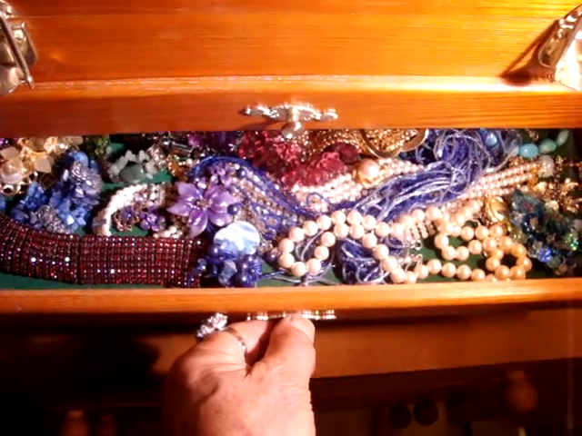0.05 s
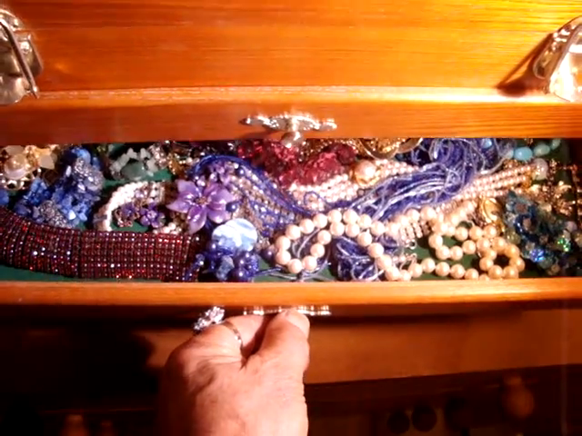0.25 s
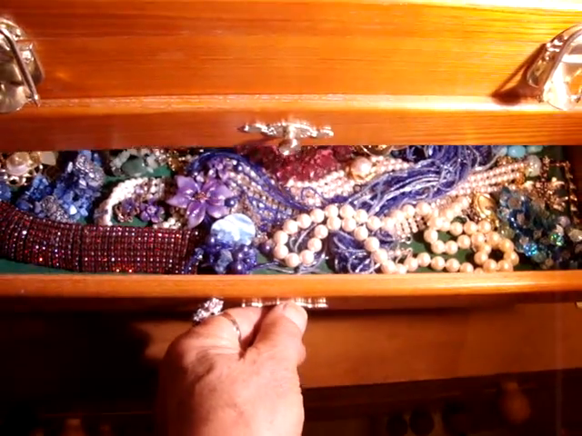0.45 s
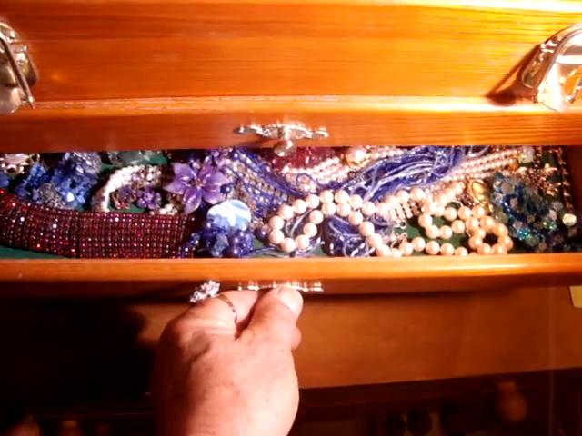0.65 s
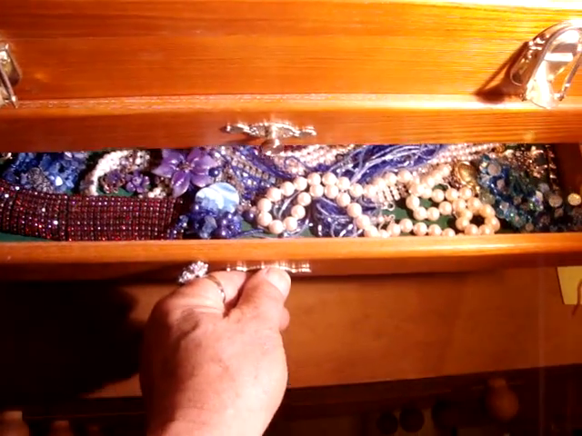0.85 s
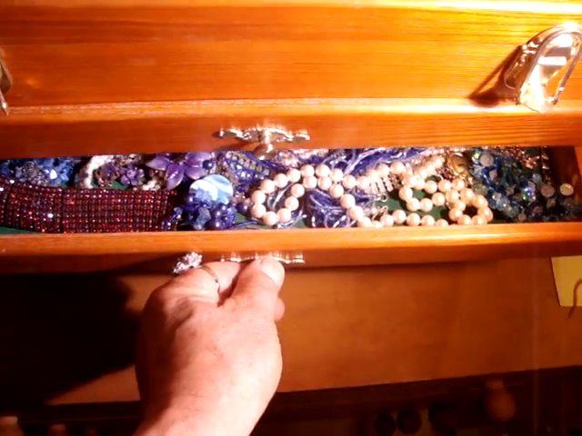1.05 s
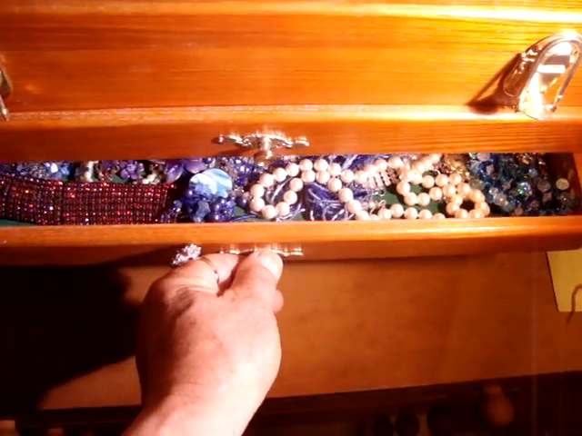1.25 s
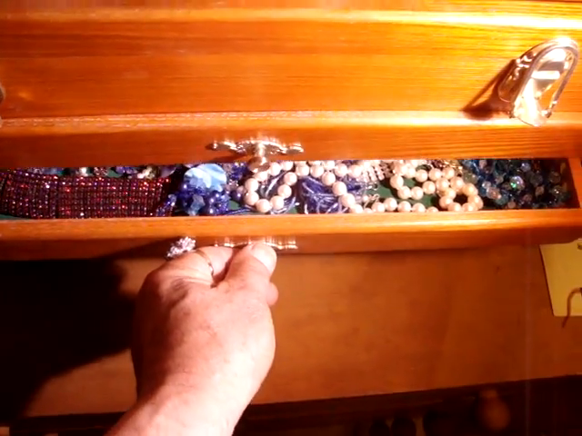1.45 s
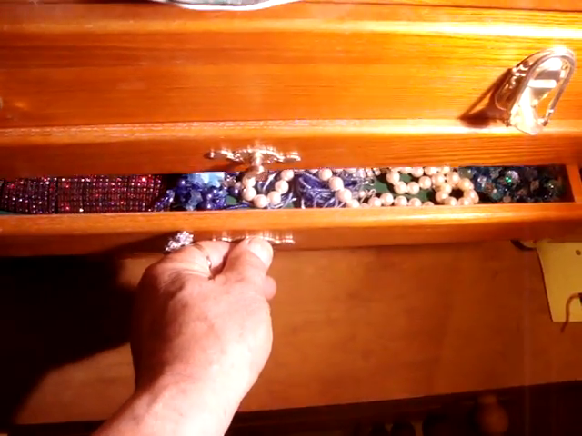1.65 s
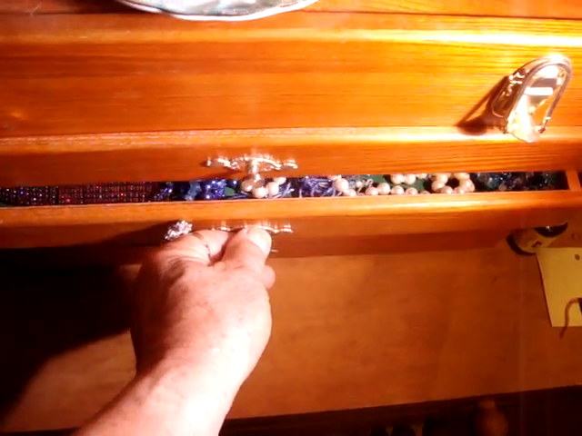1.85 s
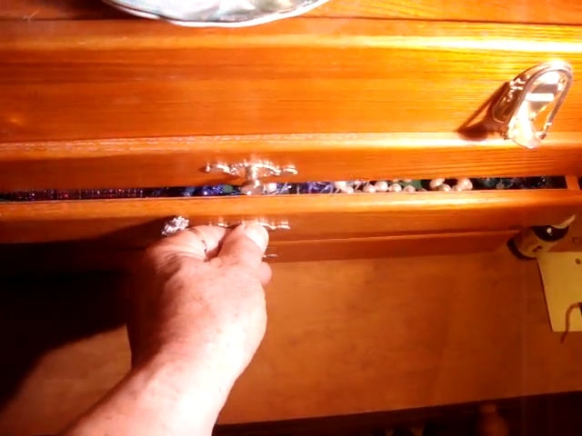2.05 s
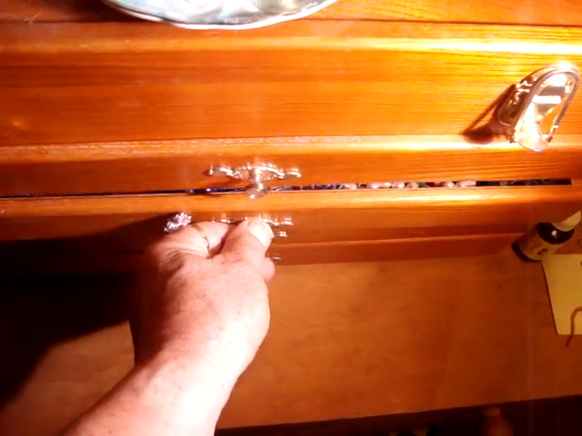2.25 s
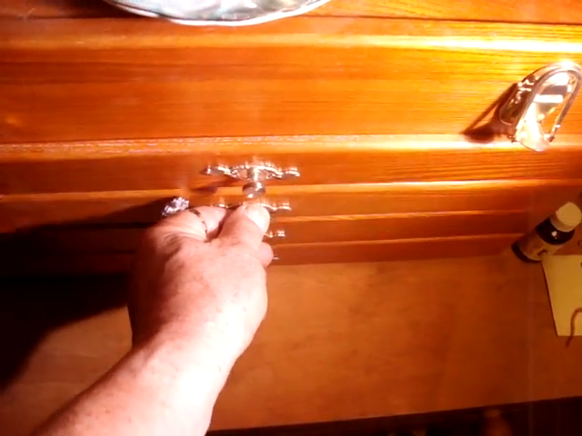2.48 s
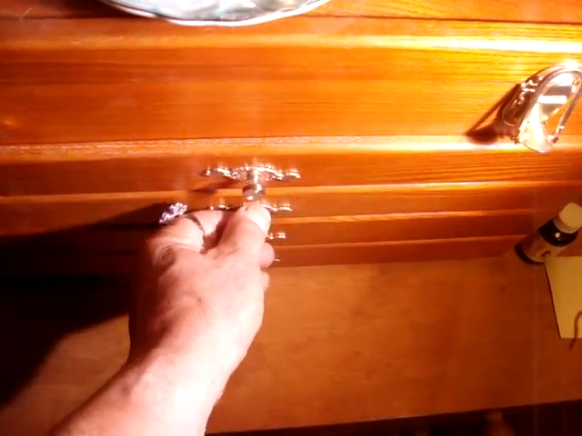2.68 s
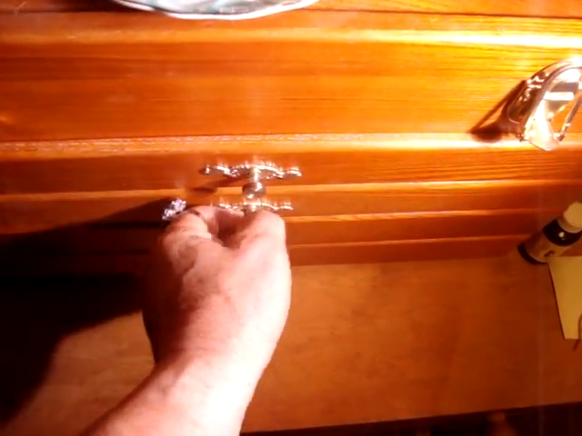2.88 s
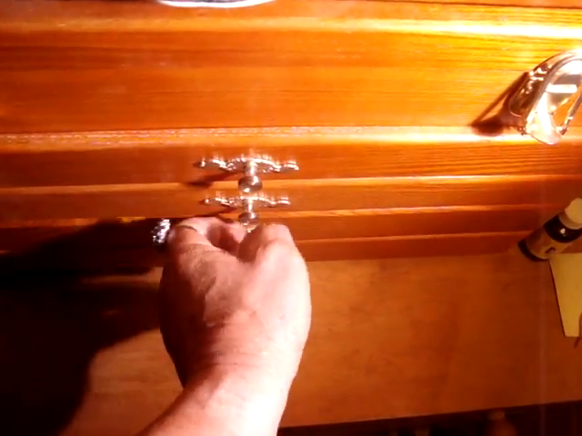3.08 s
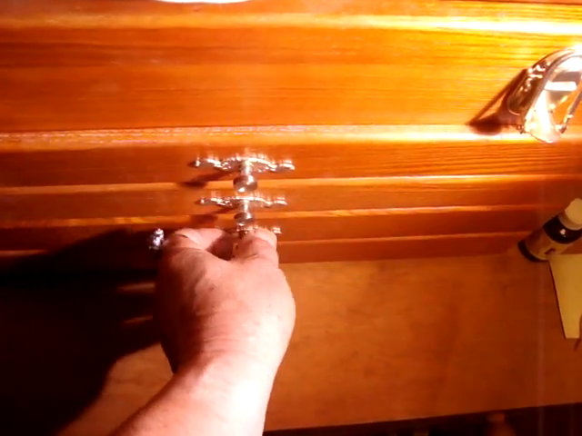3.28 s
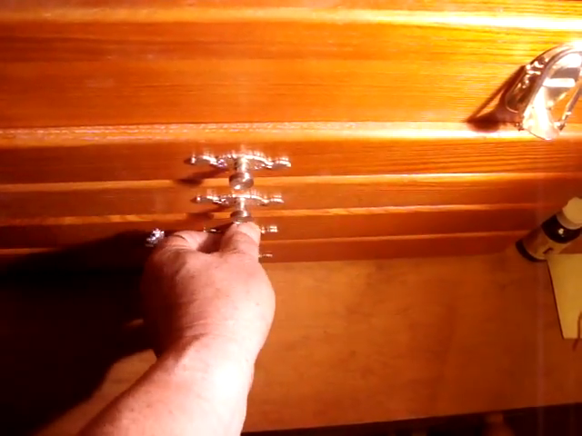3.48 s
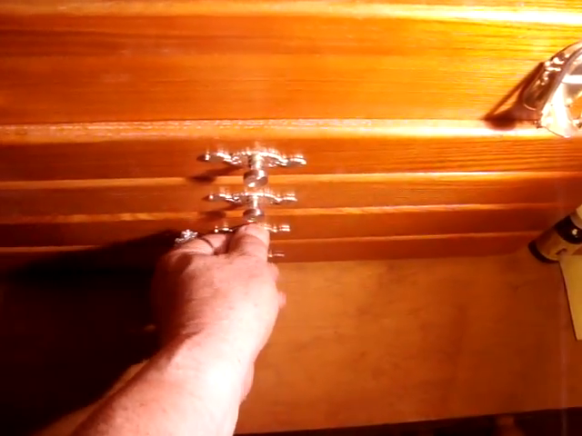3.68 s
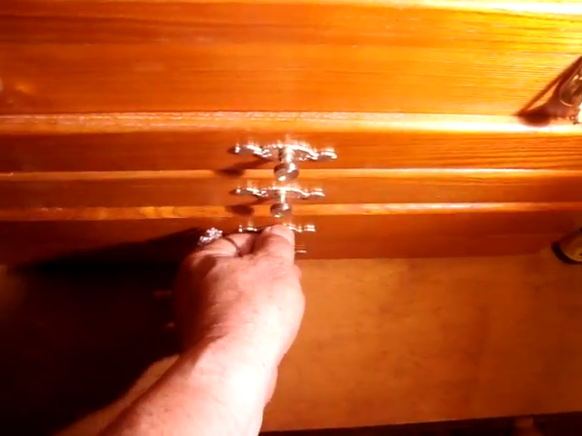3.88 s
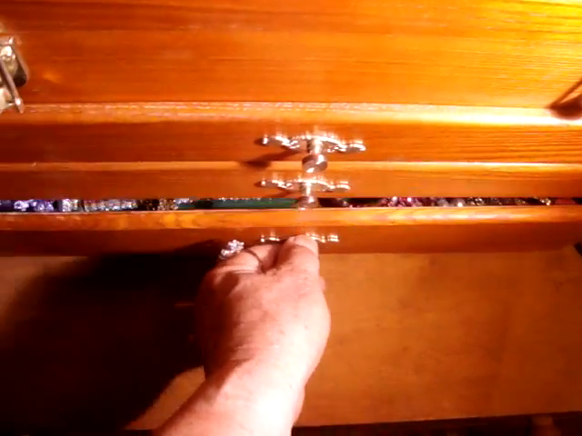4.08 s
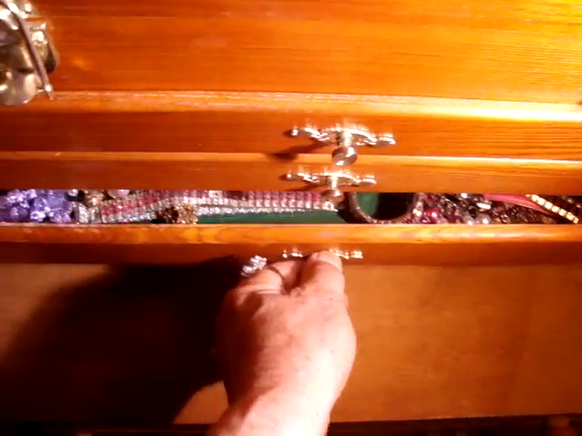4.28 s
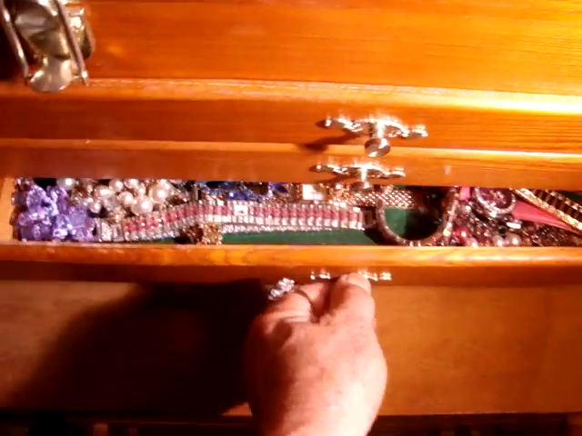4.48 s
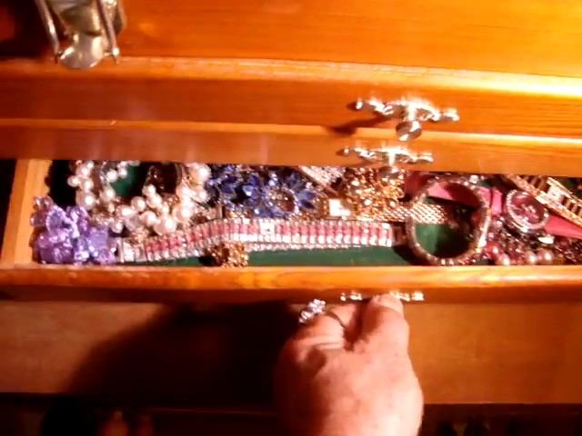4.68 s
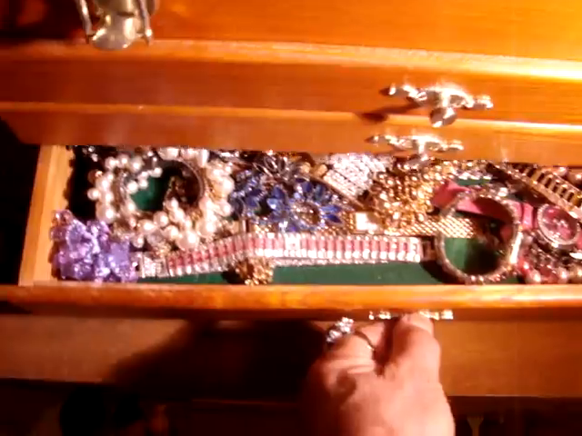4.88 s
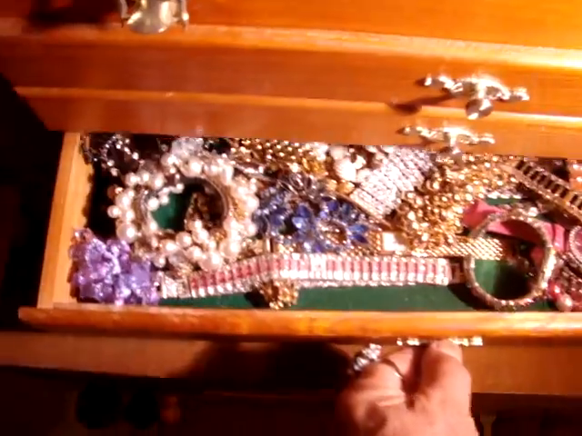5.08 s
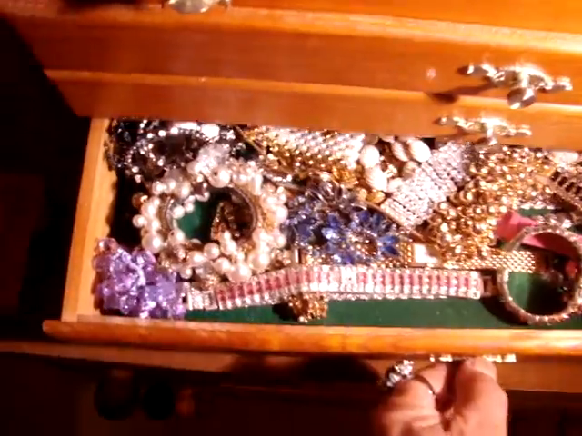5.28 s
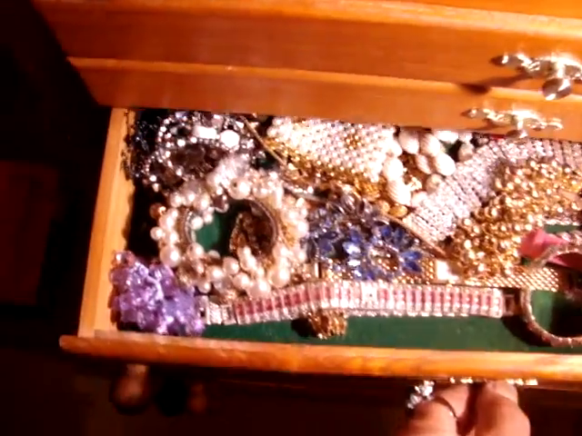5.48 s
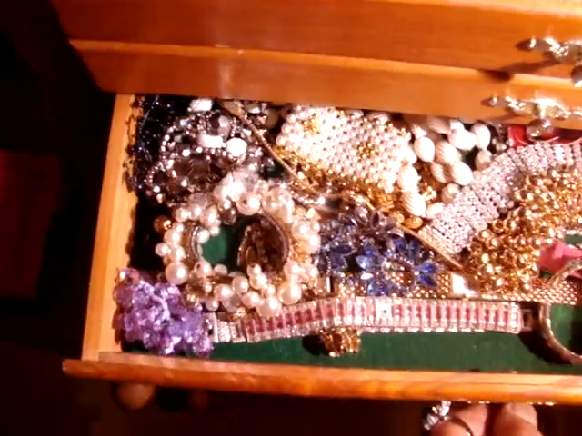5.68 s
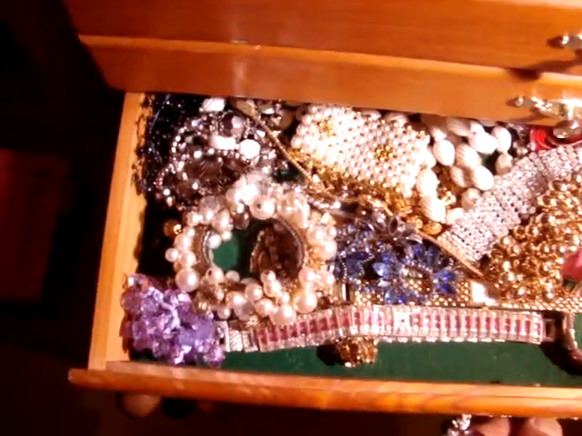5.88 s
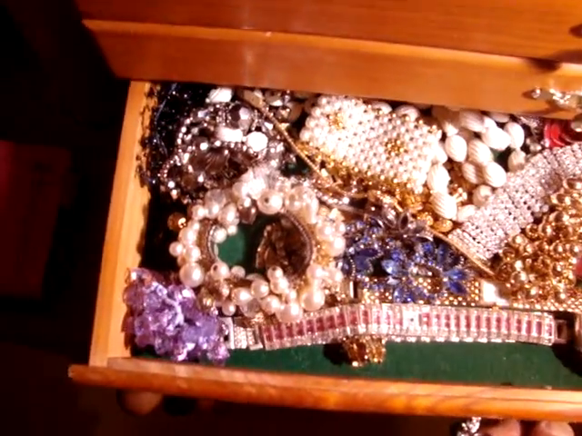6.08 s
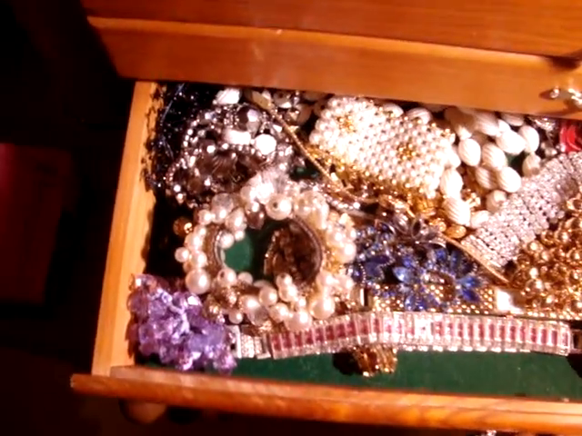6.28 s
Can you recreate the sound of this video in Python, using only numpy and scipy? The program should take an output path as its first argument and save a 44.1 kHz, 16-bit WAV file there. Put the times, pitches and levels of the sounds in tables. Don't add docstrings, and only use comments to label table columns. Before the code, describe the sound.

Close up in a quiet room, a shallow wooden drawer is pushed shut with a grainy, resonant rub and a few faint ticks, ending in a loud hollow wooden knock with a quick rattle. After a near-silent pause with tiny metal clicks, a second drawer is pulled open, rubbing unevenly and bumping softly at its stop. The small microphone hisses steadily over a faint distant rumble.

```python
import sys
import numpy as np
from scipy import signal
from scipy.fft import rfft, irfft, next_fast_len
from scipy.io import wavfile
from scipy.ndimage import uniform_filter1d

SR = 44100
rng = np.random.default_rng(int(sys.argv[2]) if len(sys.argv) > 2 else 0)


def voltage_ratio(decibels):
    exponent = np.asarray(decibels, float) / 20
    return 10 ** exponent


def master_out(mix):
    frames = np.transpose(np.atleast_2d(mix))
    ceiling = np.clip(frames, -1, 1)
    pcm = np.round(ceiling * 32767).astype(np.int16)
    wavfile.write(sys.argv[1], SR, pcm)


N = 279622

# pitch_hz, width_hz, level_db
UPPER_PANELS = [(600, 37, 5), (990, 39, -15), (1356, 24, 4.5), (1505, 150, -0.5), (1900, 130, -16),
                (2490, 100, -0.5), (2900, 340, -7), (3270, 125, -0.5), (4100, 250, -10), (4740, 760, -14.5)]
# pitch_hz, width_hz, level_db
LOWER_PANELS = [(600, 33, 0), (770, 120, 4.5), (1100, 250, 0), (1380, 110, 3.5), (1860, 200, -2.5),
                (2210, 180, -7.5), (2680, 280, -3), (2930, 130, 0.5), (3470, 220, -10), (4060, 52, -3),
                (5300, 640, -25)]
# time_s, level_db
SHARP_RINGS = [(0, -13), (.505, -13), (.517, 5), (.9, 5.5), (1.1, -0.5), (1.4, -15), (2.5, -26)]
# freq_hz, level_db
RUB_SPECTRUM = [(250, -47), (450, 6.5), (1000, 11), (3000, 4.5), (6000, -2.5), (10000, -9)]

# time_s, pressure_db, load_zone (0 bottom panel, 1 front
PUSH_SHUT = [(0, -61, 0.78), (.2, -49, .7), (.3, -60, 1.0), (.42, -51, 1.1), (.505, -51, 0.92),
             (.518, -46.5, 1.0), (.64, -47.5, 1.02), (.82, -47, 1.18), (1.1, -52, 1.1),
             (1.19, -55, 1.0), (1.27, -49.5, 1.64), (1.36, -53.5, 1.0), (1.5, -56, 1.5), (1.63, -52, 1.35),
             (1.8, -49.5, 1.2), (1.87, -59, 1.6), (2.2, -60, 1.0), (2.48, -53.5, 1.3)]
PULL_OPEN = [(3.85, -70, .8), (3.95, -61, 1.2), (4.13, -53, 1.3), (4.22, -54, 1.2), (4.32, -57, 1.4),
             (4.43, -52.5, 1.27), (4.6, -50.5, 1.3), (4.645, -46.5, 1.1), (4.69, -47, 1.05),
             (4.77, -51, 1.1), (4.95, -48.5, .9), (5.03, -48, 0.59), (5.09, -53, 1.36), (5.2, -55.5, 1.27),
         (5.47, -59.5, 1.3), (5.6, -49, 0.8), (5.69, -54.5, 1), (5.75, -63, .1)]

# pitch_hz, level_db, t60_s
CABINET_MODES = [(284, -0.5, 0.054), (391, -11.5, 0.038), (481, -1, 0.017), (650, 6, 0.025),
                 (853, 2.5, 0.026), (950, 1, 0.029), (1094, -0.5, 0.025), (1208, 6.5, 0.027),
                 (1380, 2, 0.023), (1580, -15.5, 0.033), (1650, -4.5, 0.025), (1945, 1.5, 0.021),
                 (2110, 2, 0.023), (2370, -3, 0.025), (3050, -9, 0.056), (3100, -1, 0.022),
                 (3770, -15, 0.013), (4600, -14, .012), (5700, -31, .012)]
# start_s, level_db, centre_hz, spread_oct, ring_time_factor
RAPS = [
    (.1628, -24, 1080, 0.93, 0.73),
    (2.5464, -16.5, 484, 0.24, 1.9),
    (2.5469, -4, 1240, 0.7, 0.27),
    (2.5487, -7.5, 1280, 0.64, 0.32),
    (4.665, -33, 1800, .8, 0.64),
]
# start_s, level_db, centre_hz, spread_oct, ring_time_factor
THUDS = [(0.1616, -36, 1150, 1.4, 0.88), (1.795, -42, 400, 0.56, 0.77), (2.4935, -27, 452, 0.36, 0.77),
         (2.497, -26.5, 760, 1.24, 0.68), (2.503, -41, 504, 0.37, 0.84), (2.543, -39.5, 1500, 0.89, 0.69),
         (2.5514, -1.5, 1380, 0.4, 0.13), (2.554, -23, 1770, 0.6, 0.8), (2.558, -22, 1520, 0.15, 0.73),
         (2.563, -22.5, 830, 0.35, 1.1), (2.572, -49, 1490, 0.97, 0.53), (2.579, -32, 1290, 0.63, 1.1),
         (4.074, -40, 420, 0.92, 2.1), (4.088, -38.5, 750, 1.2, 1), (4.66, -30, 1200, 1, 0.35),
         (4.74, -34.5, 1620, 0.35, 0.96), (4.78, -36.5, 1300, .6, 1.4)]
# start_s, level_db, centre_hz, width_hz, t60_s
TICKS = [(.162, -36, 3564, 1200, 0.027), (.418, -45, 4870, 1500, 0.026), (.418, -41.5, 8400, 2500, 0.02),
         (.419, -42, 3100, 1400, 0.038), (.78, -49.5, 4100, 540, 0.62), (1.61, -57, 3050, 550, 2.4),
         (2.288, -46.5, 6770, 500, 0.018), (3.272, -49, 1900, 300, 0.2), (3.274, -49.5, 916.7, 756, 0.13),
         (3, -59, 4300, 400, .05), (3.1, -54, 430, 150, .06), (3.796, -46.5, 2900, 1944, 0.041),
         (2.8, -48, 500, 400, 0.028), (4.2, -56, 1000, 600, 0.044), (4.44, -55, 2700, 700, 0.94),
         (4.655, -38.5, 2040, 300, .06), (4.699, -49, 1770, 500, 1), (4.98, -58, 3800, 1000, .7),
         (5.269, -45.5, 2500, 2500, 0.027), (5.562, -47, 650, 400, 0.78), (5.565, -55, 3200, 1600, 0.49)]
# start_s, level_db, pitch_hz, t60_s
BUMPS = [(1.797, -40, 280, 0.055), (2.494, -39, 245, .1), (2.55, -30, 171, 0.072), (2.559, -45, 114, 0.13),
         (3.733, -39.5, 210, 0.026), (4.074, -29.5, 269, 0.031), (5.563, -35, 188, 0.051),
         (5.636, -47.5, 196, 0.12), (5.621, -46.5, 351, 0.16), (5.709, -53, 200, 0.054)]

# freq_hz, t60_s
ROOM_DECAY = [(100, 0.34), (500, 0.18), (1500, 0.073), (4000, 0.019), (10000, 0.12)]
# freq_hz, density_db_per_hz
HISS_SPECTRUM = [(15, -54), (25, -8), (97, -17), (190, -7), (284, -4), (355, -4), (403, -2.5), (456, -3.5),
                 (492, -4.5), (648, -3), (1040, -6), (1150, -6), (2630, -10), (9920, -19.5), (12900, -85),
                 (21800, -120)]
# time_s, level_db
RUMBLE_LEVEL = [(0.0, -69), (0.3, -67), (4.3, -70), (4.7, -76.5), (6.34, -75)]
# click_s, low_hz, high_hz, depth_db
CLICK_GAPS = [(.164, 3200, 4600, -30), (.163, 5500, 8800, -22), (.42, 6600, 10500, -45),
              (2.289, 6200, 7800, -30), (2.546, 680, 10500, -50), (3.082, 6400, 7600, -35)]


def evened(x):
    return x / np.sqrt(np.mean(x ** 2) + 1e-20)


def read(points, hz):
    f, value = np.transpose(points)
    return np.interp(np.log(hz + 1), np.log(f + 1), value)


def add(mix, start_s, sound):
    part = mix[round(start_s * SR):][:len(sound)]
    part += sound[:len(part)]


def colour(x, gain):
    size = next_fast_len(len(x))
    return irfft(rfft(x, size) * gain(np.fft.rfftfreq(size, 1 / SR)), size)[:len(x)]


def wood_slips(size, judder_db, grit_db):
    judder = uniform_filter1d(uniform_filter1d(rng.standard_normal(N), 300), 300)
    judder = evened(judder)[:size]
    strength = voltage_ratio(grit_db * np.minimum(rng.exponential(1, N), 5))
    happens = rng.random(N) < 5000 / SR
    slips = strength * happens * rng.choice([-1, 1], N)
    return evened(slips[:size]) * voltage_ratio(judder_db * judder)


def slide(rows, panels, sharp_db, zones_db, judder_db, grit_db, rub_db):
    time_s, pressure_db, load = np.transpose(rows)
    t = np.arange(time_s[0], time_s[-1], 1 / SR)
    slips = wood_slips(len(t), judder_db, grit_db)
    zones = np.zeros((3, len(t)))
    for hz, width_hz, db in panels:
        ring = colour(slips, lambda f: voltage_ratio(db) / (1 + 2j * (f - hz) / width_hz))
        wax_db = 1.3 * np.interp(t, np.arange(200) * 0.044, rng.standard_normal(200))
        ring = ring * voltage_ratio(wax_db)
        if hz > 1300 and width_hz < 270 and not 1500 < hz < 2200:
            ring = ring * voltage_ratio(sharp_db(t))
        zones[np.searchsorted([1150, 2200], hz)] += ring
    for k, (low_hz, high_hz) in enumerate([(0, 1150), (1150, 2200), (2200, SR)]):
        zones[k] += colour(slips, lambda f: voltage_ratio(rub_db + read(RUB_SPECTRUM, f)) * (f >= low_hz) * (f < high_hz))

    pressure_db = np.interp(t, time_s, pressure_db)
    load = np.interp(t, time_s, load)
    rubbing = np.zeros(len(t))
    for k, zone in enumerate(zones):
        distance_db = 5.0 * abs(load - k)
        rubbing += voltage_ratio(pressure_db + zones_db[k] - distance_db) * evened(zone)
    out = np.zeros(N)
    add(out, time_s[0], rubbing)
    return out


def cabinet_blow(level_db, centre_hz, spread_oct, ring, crack_db, chance):
    t = np.arange(SR // 5) / SR
    hz, mode_db, t60_s = np.transpose(CABINET_MODES)[:, :, None]
    level_chance, tune_chance = chance

    reach_db = -6 * (np.log2(hz / centre_hz) / spread_oct) ** 2
    envelopes = voltage_ratio(mode_db + reach_db + 2 * level_chance - 60 * t / (t60_s * ring))
    tones = envelopes * np.sin(2 * np.pi * hz * (1 + 0.017 * tune_chance) * t)
    signs = (-1) ** np.arange(len(hz))[:, None]
    body = (tones * signs).sum(0)

    crack = evened(colour(rng.standard_normal(len(t)), lambda f: 1 / (1 + ((f - 3300) / 3600) ** 2)))
    crack = crack * voltage_ratio(crack_db - 60 * t / 0.011)

    def near_blow(f):
        octaves = np.log2((f + 1) / centre_hz)
        return voltage_ratio(-6 * (octaves / (spread_oct + 0.39)) ** 2) * (f > 120)

    clatter = evened(colour(rng.standard_normal(len(t)), near_blow))
    clatter = clatter * voltage_ratio(-13.5 - 60 * t / (0.048 * ring))
    attack = np.minimum(t / 0.00049, 1)
    return voltage_ratio(level_db) * (body / abs(body).max() + crack + clatter) * attack


def blows():
    out = np.zeros(N)
    rows = [(*rap, -9.0 - 0.46 * (rap[1] + 25)) for rap in RAPS]
    rows += [(*thud, -33.5) for thud in THUDS]
    chances = rng.standard_normal((len(rows), 2, len(CABINET_MODES), 1))
    for (start_s, *blow), chance in zip(sorted(rows), chances):
        add(out, start_s, cabinet_blow(*blow, chance))
    return out


def ticks():
    out, t = np.zeros(N), np.arange(SR // 4) / SR
    for start_s, level_db, hz, width_hz, t60_s in TICKS:
        rise_s = max(0.06 * t60_s, 1e-4)
        noise = rng.standard_normal(len(t))
        chatter = evened(colour(noise, lambda f: 1 / (1 + (2 * (f - hz) / width_hz) ** 2)))
        decay = voltage_ratio(level_db - 60 * np.maximum(t - rise_s, 0) / t60_s)
        add(out, start_s, chatter * decay * np.minimum(t / rise_s, 1))
    return out


def bumps():
    out, t = np.zeros(N), np.arange(SR // 3) / SR
    for start_s, level_db, hz, t60_s in BUMPS:
        tone = voltage_ratio(level_db - 60 * t / t60_s) * np.sin(2 * np.pi * hz * t)
        add(out, start_s, tone * np.minimum(t / 0.0031, 1))
    return out


def room(x):
    taps = np.zeros(SR // 2)
    at = np.arange(100, len(taps) - 20, 20)
    signs = rng.choice([-1., 1.], len(at))
    taps[at + rng.integers(0, 20, len(at))] = signs
    hz, t, z = signal.stft(taps, SR, nperseg=256)
    decay = voltage_ratio(-60 * t / read(ROOM_DECAY, hz)[:, None])
    tail = signal.istft(z * decay, SR, nperseg=256)[1]
    return signal.fftconvolve(x, tail / np.linalg.norm(tail))[:N]


def air():
    hiss = evened(colour(rng.standard_normal(N), lambda f: voltage_ratio(read(HISS_SPECTRUM, f))))

    def rumble_gain(f):
        highpass = (f / 50) ** 2 / (1 + (f / 50) ** 2)
        lowpass = 1 / (1 + (f / 140) ** 4)
        lump = 1 + 0.83 / (1 + ((f - 125) / 15) ** 2)
        return highpass * lowpass * lump

    rumble = evened(colour(rng.standard_normal(N), rumble_gain))
    rumble_db = np.interp(np.arange(N) / SR, *np.transpose(RUMBLE_LEVEL))
    return voltage_ratio(-52) * hiss + voltage_ratio(rumble_db) * rumble


def scene():
    hits = blows() + bumps() + ticks()
    shut = slide(PUSH_SHUT, UPPER_PANELS, lambda t: np.interp(t, *np.transpose(SHARP_RINGS)),
                 zones_db=(1.5, -1.5, 1.5), judder_db=1.0, grit_db=0.9, rub_db=-10.5)
    pull = slide(PULL_OPEN, LOWER_PANELS, np.zeros_like,
                 zones_db=(3.5, -1.2, 3.0), judder_db=1.5, grit_db=-0.3, rub_db=-5.5)
    return (hits + voltage_ratio(-10.5) * room(hits) + shut + pull + air())[None]


def spectral_gaps(x):
    hz, t, z = signal.stft(x, SR, nperseg=256, noverlap=192)
    gaps = []
    for click_s, low_hz, high_hz, depth_db in CLICK_GAPS:
        gaps.append((click_s - 0.029, click_s - 0.004, low_hz, high_hz, depth_db))
        if depth_db < -45:
            gaps.append((click_s + 0.010, click_s + 0.041, 5500, high_hz, depth_db / 2))
            gaps.append((click_s + 0.018, click_s + 0.041, 2500, high_hz, depth_db / 2))
    for start_s, low_hz in rng.uniform([0, 4500], [N / SR, 10000], (900, 2)):
        gaps.append((start_s, start_s + 0.007, low_hz, low_hz * 1.06, -40))
    for start_s, end_s, low_hz, high_hz, depth_db in gaps:
        bins = (hz >= low_hz) & (hz <= high_hz)
        frames = (t >= start_s) & (t <= end_s)
        z[np.ix_(bins, frames)] *= voltage_ratio(depth_db)
    return signal.istft(z, SR, nperseg=256, noverlap=192)[1][:N]


def top_cut(x):
    return signal.sosfilt(signal.butter(12, 10070, fs=SR, output="sos"), x)


def record(dry):
    heard = 0.6 * np.tanh(dry[0] / 0.6)
    heard = colour(heard, lambda f: (f / 42) ** 4 / (1 + (f / 42) ** 4) / (1 + (f / 10120) ** 400))
    mix = spectral_gaps(heard)[None]
    return top_cut(mix)


dry = scene()
out = record(dry)
master_out(out)
```